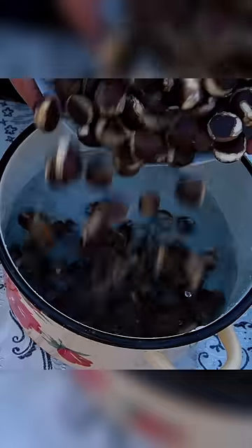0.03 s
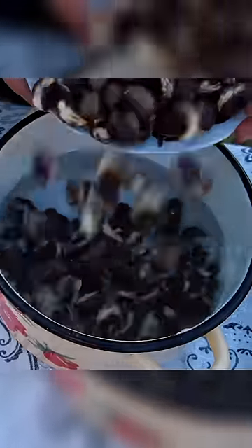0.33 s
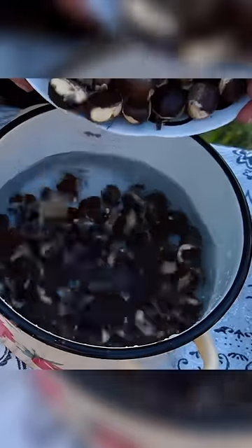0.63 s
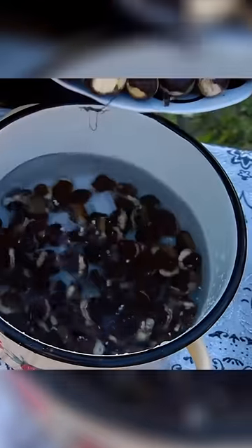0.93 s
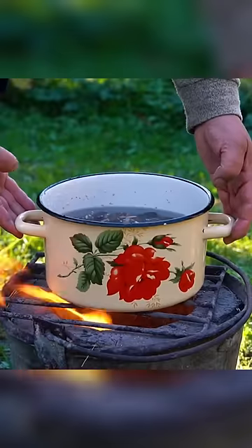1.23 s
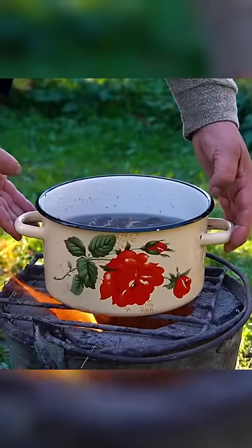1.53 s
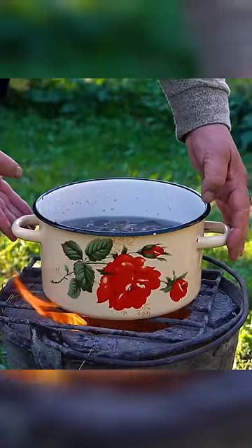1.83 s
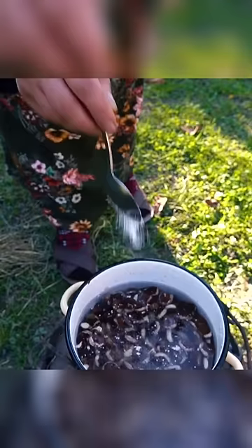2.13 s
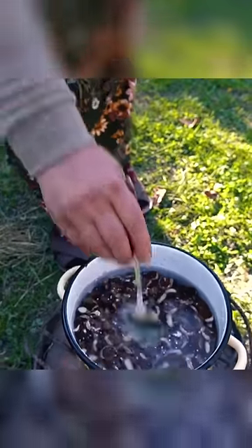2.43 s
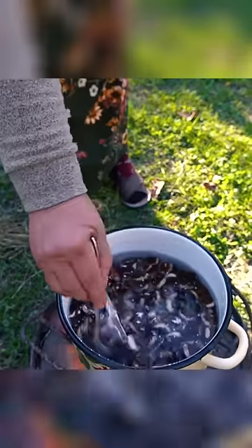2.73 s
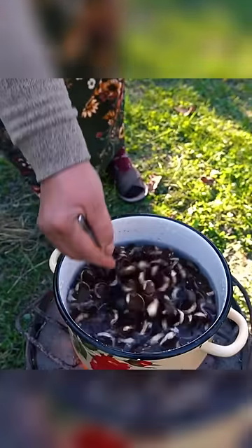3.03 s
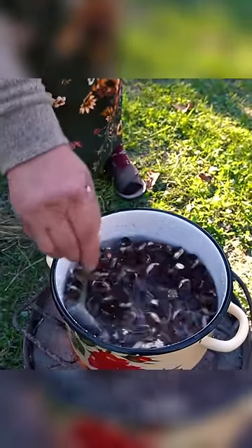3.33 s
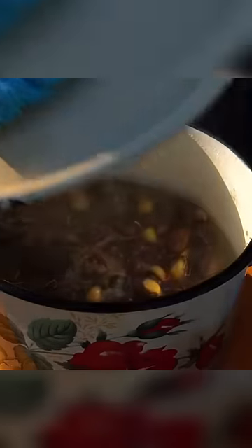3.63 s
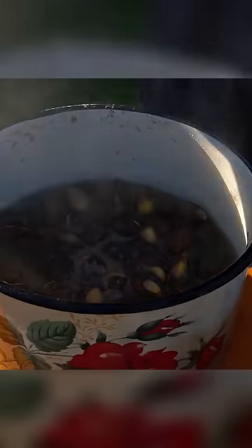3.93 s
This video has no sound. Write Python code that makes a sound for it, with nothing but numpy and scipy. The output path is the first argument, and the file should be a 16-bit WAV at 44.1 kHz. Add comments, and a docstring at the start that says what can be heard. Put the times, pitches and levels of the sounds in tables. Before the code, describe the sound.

Chestnuts splash and plop rapidly into a ringing enamel pot of water for the first second. Small birds chirp on and off from about 0.7 seconds over soft outdoor hiss and rumble. From 1.3 to 3.4 seconds a wood fire snaps. Salt patters faintly at 2.3, then a spoon swirls the water, knocking chestnuts against the pot until 3.4, under high bird whistles. Faint air and chirps remain.

```python
"""Chestnuts tumble into an enamel pot of water: each one slaps, sprays and plops, and the pot rings.
Then the pot stands on a wood fire that snaps and ticks. Salt patters in, and a stirring spoon knocks
the chestnuts against the pot. Small birds chirp and whistle in the garden trees, over the soft hiss
and low rumble of outdoor air. Three times the whole sound dips for a moment."""
import sys
import numpy as np
from scipy import signal
from scipy.fft import rfft, irfft
from scipy.io import wavfile
from scipy.ndimage import uniform_filter1d

SR = 44100
rng = np.random.default_rng(int(sys.argv[2]) if len(sys.argv) > 2 else 0)


def pcm_store(signal):
    """Save signal as 16-bit PCM."""
    levels = np.round(np.clip(np.atleast_2d(signal), -1, 1) * 32767)
    wavfile.write(sys.argv[1], SR, levels.astype(np.int16).T)


N = 176400
TIME = np.arange(N) / SR
HIT_TIME = np.arange(8192) / SR  # the clock of one short hit

# tone colour of the air's hiss and rumble: f/Hz, level/dB
AIR_COLOUR = [(150, -5), (380, 1.5), (1200, -4.5), (2200, -8), (4000, -11), (9000, -14.5), (16000, -19)]
RUMBLE_COLOUR = [(15, -2), (68, 2), (150, -10.5), (450, -26.5), (1000, -50)]
# their loudness over time: t/s, level/dB
AIR_LOUDNESS = [(0, -37), (.06, -50), (2.1, -50), (3.44, -46.5), (3.47, -55.5), (4, -52.5)]
RUMBLE_LOUDNESS = [(0, -41.5), (1.1, -43.5), (1.5, -36), (3.4, -36.5), (3.48, -46.5)]
# moments when everything goes quiet: start/s, end/s
DIPS = [(.038, 0.058), (1.224, 1.245), (3.445, 3.464)]

# short bird calls: t/s, length/s, start f/Hz, end f/Hz, level/dB, trill depth/Hz
BIRD_CHIRPS = [(0.684, 0.065, 8100, 6980, -41.5, 120), (0.769, 0.053, 7000, 6320, -38.5, 494),
               (0.859, 0.071, 5150, 4750, -30, 50), (0.928, 0.041, 6000, 7030, -40.5, 850),
               (1.004, 0.033, 6000, 6920, -40, 850), (1.366, 0.023, 4630, 7440, -33.5, 250),
               (1.505, 0.093, 3810, 3675, -55, 50), (2.221, 0.11, 7850, 8070, -48.5, 231),
               (2.397, 0.052, 6150, 6980, -37.5, 161), (3.142, 0.079, 4500, 3816, -42, 334),
               (3.258, .038, 5400, 3460, -33.5, 307), (3.345, 0.035, 3206, 3995, -31.5, 100),
               (3.409, 0.026, 4400, 3410, -42.5, 303), (3.834, 0.017, 6000, 7240, -44, 300),
               (3.909, 0.019, 6300, 7230, -45.5, 300)]
# three long bird calls: t/s, f/Hz, level/dB
BIRD_BUZZ = [(.935, 4630, -38), (0.995, 4900, -32), (1.035, 4904, -29), (1.1, 5043, -34),
             (1.225, 5374, -39)]
EVEN_WHISTLE = [(2.495, 5930, -36.5), (2.515, 6410, -33.5), (2.545, 6416, -35), (2.58, 6400, -39),
                (2.625, 6500, -29), (2.665, 6570, -53)]
SINKING_WHISTLE = [(2.727, 9270, -24), (2.748, 8700, -27), (2.81, 8395, -32), (2.86, 8140, -40.5),
                   (2.94, 7820, -31), (2.98, 7785, -38), (3.025, 7637, -22), (3.06, 7900, -65)]

# burning wood snaps: t/s, peak level/dB
WOOD_SNAPS = [(1.4143, -26), (1.4922, -19.5), (1.570, -19), (1.6881, -27), (1.7213, -20.5), (1.8405, -17.5),
              (1.846, -20), (1.921, -19), (1.9936, -24), (2.036, -27), (2.522, -17.5), (2.9282, -22.5),
              (3.2347, -13)]
# colour of a snap's sharp crack and of its longer body: f/Hz, level/dB
CRACK_COLOUR = [(1500, -9.5), (3500, -10.5), (5500, -5.5), (8000, -10), (11000, -8), (16000, -19.5)]
BODY_COLOUR = [(300, -18), (900, -16), (2000, -1), (3500, 9.5), (7000, -8)]

# loudness of the pot scraping on the grate, falling salt and stirred water: t/s, level/dB
SCRAPE_LOUDNESS = [(1.24, -52), (1.32, -45.5), (1.45, -60)]
SALT_LOUDNESS = [(2.32, -44), (2.385, -56)]
STIR_LOUDNESS = [(2.58, -55.5), (2.75, -44.5), (3.1, -42.5), (3.31, -48), (3.43, -43.5), (3.47, -90)]
# stirred chestnuts hit the pot: t/s, thud level/dB, thud f/Hz, clack level/dB, click level/dB
SPOON_KNOCKS = [(2.391, -22.5, 430, -26, -33.5), (2.629, -40, 460, -33, -38.5),
                (2.721, -23.5, 738, -25.5, -24), (2.745, -25, 516, -27, -32), (2.802, -26, 836, -30, -38),
                (2.862, -41, 473, -36.5, -35), (2.895, -36, 683, -30.5, -43), (2.925, -28, 432, -35, -36.5),
                (2.997, -48, 483, -36, -26.5), (3.359, -29.5, 566, -29.5, -48),
                (3.377, -28, 798, -32.5, -49), (3.427, -29, 515, -29, -44)]
# colour of a knock's clack and of the click of shell on steel: f/Hz, level/dB
CLACK_COLOUR = [(200, -24), (450, 8.5), (800, 0.5), (1600, 0), (2700, -8), (6000, -56)]
CLICK_COLOUR = [(1500, -8), (2800, 0.5), (5000, -2), (9000, -20)]
# ringing notes of the pot on the grate: f/Hz, level/dB, fade time/s
GRATE_POT_NOTES = [(430, -1, 0.62), (805, -6, 0.16)]

# large single bubbles: t/s, f/Hz, level/dB
BIG_BUBBLES = [(0.136, 1315, -23), (0.235, 1213, -24.5), (0.331, 1680, -24.5), (0.344, 1280, -25),
               (0.485, 1320, -25.5), (0.533, 3800, -25), (2.648, 445, -31.5)]
# chestnuts hit the water: t/s, plop level/dB, plop f/Hz, spray level/dB
NUT_DROPS = [(0.064, -25.5, 655, -32), (0.135, -26, 674, -33.5), (0.146, -24, 713, -28.5),
             (0.203, -35, 310, -26.5), (0.220, -24.5, 305, -27), (0.239, -27.5, 633, -41),
             (0.259, -32, 363, -27.5), (0.282, -27.5, 296, -45), (0.329, -30, 268, -28),
             (0.375, -33.5, 683, -26), (0.456, -26, 652, -28.5), (0.485, -32.5, 282, -29.5),
             (0.518, -27.5, 687, -26.5), (0.541, -32, 300, -28), (0.565, -34.5, 302, -31.5),
             (0.650, -28.5, 320, -34), (0.692, -32.5, 744, -36.5), (0.770, -32.5, 664, -37.5),
             (0.850, -43, 395, -43)]
# colour of a slap on the water and of its spray: f/Hz, level/dB
SLAP_COLOUR = [(150, -21), (270, 2.5), (480, -13), (680, 0), (1300, -6), (2600, -21), (6000, -52)]
SPRAY_COLOUR = [(1000, -39), (2300, -1.5), (3900, -1), (6500, -1.5), (10000, -4.5), (16000, -12)]
# water churned by the falling chestnuts: t/s, level/dB
CHURN_LOUDNESS = [(.055, -84), (.065, -33), (.15, -31.5), (.19, -42), (.22, -33.5), (.55, -36),
                  (.62, -46.5), (.8, -50), (.95, -89)]
# ringing notes of the pot and the air in it: f/Hz, level/dB, fade time/s
POT_NOTES = [(268.4, -2, 0.13), (314, -4.5, 0.1), (636, -2, 0.2), (696, -7.5, 0.26), (1206, -2.5, 0.072),
             (1305, -3.5, 0.086)]

# A fade time is how long a sound takes to drop by 60 dB. A lower "side" level sounds narrower.
AIR_SIDE_DB, WATER_SIDE_DB, SPRAY_SIDE_DB = -2, -25, -7
PLOP_FADE_S, PLOP_ATTACK_S, PLOP_RISE_PER_S = 0.041, 0.0015, 4.2
SLAP_FADE_S, SPRAY_FADE_S, CLACK_FADE_S = 0.047, 0.035, 0.058
GRAIN_DB, PEAKY_DB = -0.5, 5.5
BUBBLES_PER_S, BUBBLE_CYCLES, BUBBLE_SPREAD_DB = 600, 11.9, 7
TICKS_PER_S, TICKS_DB, FIRE_HISS_DB = 89, -57, -62
TRILL_HZ, DIP_DB, CUTOFF_HZ = 178.6, -29.5, 16300


def amp(db):
    """Turn decibels into a gain to multiply by."""
    return 10 ** (np.asarray(db) / 20)


def unit(x):
    """Scale a sound so its average strength (rms) is 1."""
    return x / np.sqrt(np.mean(x ** 2) + 1e-20)


def curve(rows):
    """Gain over time from rows of t/s, level/dB."""
    return amp(np.interp(TIME, *np.transpose(rows)))


def add(out, s, x):
    """Mix a sound in, starting at s seconds."""
    i = max(int(s * SR), 0)
    out[:, i:i + x.shape[-1]] += x[..., :N - i]


def noise(spectrum, side_db, size, grain_db=0, peaky_db=0):
    """Stereo noise of a given colour; grain roughens it, and peaky_db lifts or lowers random pitches."""
    hz, db = np.transpose(spectrum)
    white = rng.standard_normal((2, size)) * amp(grain_db * np.minimum(rng.exponential(1, size), 5))
    f = np.maximum(np.fft.rfftfreq(size, 1 / SR), 1)
    peaks = np.interp(np.sqrt(f), np.linspace(0, np.sqrt(SR / 2), 90), rng.standard_normal(90))
    bass_cut = np.minimum(f / hz[0], 1) ** 2
    colour = amp(np.interp(np.log(f), np.log(hz), db) + peaky_db * peaks) * bass_cut
    mid, side = irfft(rfft(white) * colour, size)
    return unit(mid + amp(side_db) * side * np.array([[1], [-1]]))


def burst(spectrum, side_db, fade_s, grain_db=0, peaky_db=0):
    """A dying puff of noise that starts at a strength of about 1."""
    fall = amp(-60 * HIT_TIME / fade_s)
    puff = noise(spectrum, side_db, len(HIT_TIME), grain_db, peaky_db) * fall
    return unit(puff) * np.sqrt(np.mean(fall ** 2))


def blip(hz, fade_s, attack_s, rise=0):
    """A short, fading pure note whose pitch may rise."""
    shape = amp(-60 * HIT_TIME / fade_s) * (1 - np.exp(-HIT_TIME / attack_s))
    return shape / shape.max() * np.sin(2 * np.pi * hz * (HIT_TIME + rise * HIT_TIME ** 2 / 2))


def ringing(x, notes):
    """A sound plus the ringing notes that it wakes."""
    out = x.copy()
    for hz, db, fade_s in notes:
        decay = np.exp(-np.log(1000) / (fade_s * SR))
        feedback = [1, -2 * decay * np.cos(2 * np.pi * hz / SR), decay * decay]
        out += amp(db) * 2 * signal.lfilter([1 - decay, 0, decay - 1], feedback, x + 1e-18)
    return out


def echoes(x, fade_s, echo_db):
    """A sound plus a dying cloud of echoes, different in each ear."""
    t = TIME[:SR]
    tail = rng.standard_normal((2, SR)) * amp(-60 * t / fade_s) * np.minimum(t / (fade_s * 0.0055), 1)
    tail /= np.sqrt(np.sum(tail ** 2, axis=1, keepdims=True))
    return x + amp(echo_db) * signal.fftconvolve(x, tail, axes=1)[:, :N]


def outdoor_air():
    """The soft hiss of the garden over a low rumble."""
    hiss = curve(AIR_LOUDNESS) * noise(AIR_COLOUR, AIR_SIDE_DB, N)
    rumble = curve(RUMBLE_LOUDNESS) * noise(RUMBLE_COLOUR, side_db=-21.5, size=N)
    return hiss + rumble


def bird_voice(hz, gain, depth_hz, pan_db=0, lag_s=0):
    """A bird's throat makes a pure tone whose pitch trills unevenly and rasps."""
    unsteady = unit(uniform_filter1d(rng.standard_normal(len(hz)), size=200))
    rasp = unit(uniform_filter1d(rng.standard_normal(len(hz)), size=40))
    trill = np.sin(2 * np.pi * np.cumsum(TRILL_HZ * (1 + 0.215 * unsteady)) / SR) + 0.44 * rasp
    phase = 2 * np.pi * np.cumsum(hz + depth_hz * trill) / SR
    left = amp(pan_db) * np.sin(phase)
    right = amp(-pan_db) * np.sin(phase - 2 * np.pi * hz * lag_s)
    return gain * np.array([left, right]) * np.sqrt(2)


def long_call(rows, depth_hz, pan_db, lag_s=0):
    """A bird holds one gliding note; returns its start time and its sound."""
    s, hz, db = np.transpose(rows)
    t = np.arange(s[0], s[-1], 1 / SR)
    gain = amp(np.interp(t, s, db)) * signal.windows.tukey(len(t), .04)
    return s[0], bird_voice(np.interp(t, s, hz), gain, depth_hz, pan_db, lag_s)


def birds():
    """Chirps, a buzz and two whistles echo among the trees; the echoes stop at each dip."""
    calls = []
    for s, length, start_hz, end_hz, db, depth_hz in BIRD_CHIRPS:
        progress = np.linspace(0, 1, int(length * SR))
        gain = amp(db) * signal.windows.tukey(len(progress), 0.44)
        glide = end_hz + (start_hz - end_hz) * (1 - progress) ** 2.3  # fast at first, then slower
        calls.append((s, bird_voice(glide, gain, depth_hz)))
    calls.append(long_call(BIRD_BUZZ, depth_hz=251, pan_db=0.7))
    calls.append(long_call(EVEN_WHISTLE, depth_hz=84, pan_db=2.2))
    calls.append(long_call(SINKING_WHISTLE, depth_hz=84, pan_db=0.5, lag_s=.00005))
    out = np.zeros((2, N))
    edges = [end for _, end in DIPS] + [N / SR]
    for start, end in zip(edges, edges[1:]):
        song = np.zeros((2, N))
        for s, call in calls:
            if start <= s < end:
                add(song, s, call)
        out += echoes(song, fade_s=0.33, echo_db=1.1) * (TIME < end - .004)
    return out


def fire():
    """Burning wood snaps sharply among tiny random ticks and a faint hiss."""
    snaps = np.zeros((2, N))
    for s, db in WOOD_SNAPS:
        crack = burst(CRACK_COLOUR, side_db=-7.5, fade_s=0.0066)
        add(snaps, s, amp(db) * crack / np.abs(crack).max())
        add(snaps, s, amp(db - 20.5) * burst(BODY_COLOUR, side_db=-2, fade_s=0.02))
    tick_starts = rng.random(N) < TICKS_PER_S / SR
    ticks = tick_starts * (rng.standard_normal(N) + 1.3 * rng.standard_normal((2, N)))
    ticks = unit(signal.sosfilt(signal.butter(2, 2500, "high", fs=SR, output="sos"), ticks + 1e-18))
    hiss = amp(FIRE_HISS_DB) * noise(CRACK_COLOUR, AIR_SIDE_DB, N)
    burning = (TIME > DIPS[1][1]) & (TIME < DIPS[2][0])
    return echoes(snaps + (amp(TICKS_DB) * ticks + hiss) * burning, fade_s=0.074, echo_db=-6.5)


def pot_scrape():
    """The pot rubs softly as it settles on the grate."""
    rub = noise(SLAP_COLOUR, WATER_SIDE_DB, N, peaky_db=PEAKY_DB)
    return curve(SCRAPE_LOUDNESS) * (TIME > SCRAPE_LOUDNESS[0][0]) * rub


def bubbles(loudness, low_hz, high_hz):
    """Random bubbles ring briefly and rise in pitch, over the time that a loudness table spans."""
    out = np.zeros((2, N))
    start, end = loudness[0][0], loudness[-1][0]
    span = end - start
    for when, pitch, softness in rng.random((1500, 3))[:int(BUBBLES_PER_S * span)]:
        hz = low_hz * (high_hz / low_hz) ** pitch
        bubble = blip(hz, BUBBLE_CYCLES / hz, attack_s=0.00017, rise=11.0)
        add(out, start + when * span, amp(-BUBBLE_SPREAD_DB * softness) * bubble)
    return unit(out) * np.sqrt(span * SR / N)


def salt():
    """Salt patters on the water and leaves a brief shower of tiny bubbles."""
    return curve(SALT_LOUDNESS) * bubbles(SALT_LOUDNESS, low_hz=3100, high_hz=5830)


def water(loudness, low_hz, high_hz, spray_db):
    """Moving water: gurgling bubbles and clumps of crackling spray."""
    clumps = unit(uniform_filter1d(uniform_filter1d(rng.standard_normal(N), size=240), size=120))
    spray = unit(amp(4.5 * clumps) * noise(SPRAY_COLOUR, SPRAY_SIDE_DB, N, grain_db=4.5))
    return curve(loudness) * (bubbles(loudness, low_hz, high_hz) + amp(spray_db) * spray)


def spoon():
    """The spoon swirls the water; chestnuts thud, clack and click against the ringing pot."""
    knocks = np.zeros((2, N))
    for s, thud_db, hz, clack_db, click_db in SPOON_KNOCKS:
        thud = amp(thud_db) * blip(hz, fade_s=0.041, attack_s=0.00045)
        clack = amp(clack_db) * burst(CLACK_COLOUR, WATER_SIDE_DB, CLACK_FADE_S, peaky_db=PEAKY_DB)
        click = amp(click_db) * burst(CLICK_COLOUR, SPRAY_SIDE_DB, CLACK_FADE_S, GRAIN_DB, PEAKY_DB)
        add(knocks, s, thud + clack + click)
    stirring = TIME > SPOON_KNOCKS[0][0]
    swirl = water(STIR_LOUDNESS, low_hz=386, high_hz=1850, spray_db=-3.5)
    return ringing(knocks + stirring * swirl, GRATE_POT_NOTES)


def glugs():
    """Large bubbles pinch off one by one, each a short rising note."""
    out = np.zeros((2, N))
    for s, hz, db in BIG_BUBBLES:
        add(out, s, amp(db) * blip(hz, PLOP_FADE_S, PLOP_ATTACK_S, PLOP_RISE_PER_S))
    return out


def chestnuts():
    """Each nut slaps the water, throws spray and opens an air pocket that plops; the pot rings along."""
    splashes = np.zeros((2, N))
    for s, plop_db, hz, spray_db in NUT_DROPS:
        plop = amp(plop_db) * blip(hz, PLOP_FADE_S, PLOP_ATTACK_S, PLOP_RISE_PER_S)
        slap = amp(plop_db + 1.5) * burst(SLAP_COLOUR, WATER_SIDE_DB, SLAP_FADE_S, peaky_db=PEAKY_DB)
        spray = amp(spray_db) * burst(SPRAY_COLOUR, SPRAY_SIDE_DB, SPRAY_FADE_S, GRAIN_DB, PEAKY_DB)
        add(splashes, s, plop + slap + spray)
    churn = water(CHURN_LOUDNESS, low_hz=379, high_hz=1820, spray_db=-2.5)
    return ringing(splashes + churn, POT_NOTES)


def scene():
    """All the sounds together."""
    return outdoor_air() + chestnuts() + glugs() + pot_scrape() + salt() + spoon() + fire() + birds()


def record(dry):
    """The level dips briefly three times, and the highest treble is cut off."""
    in_dip = sum((TIME > start) & (TIME < end) for start, end in DIPS)
    gain = uniform_filter1d(amp(DIP_DB * in_dip), size=90)
    return signal.sosfilt(signal.ellip(10, .2, 80, CUTOFF_HZ, fs=SR, output="sos"), dry * gain)


dry = scene()
out = record(dry)
pcm_store(out)
```